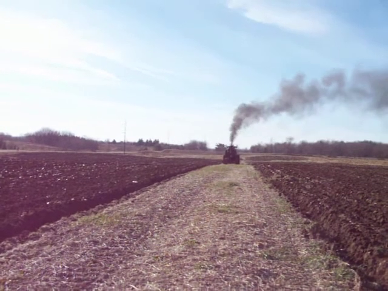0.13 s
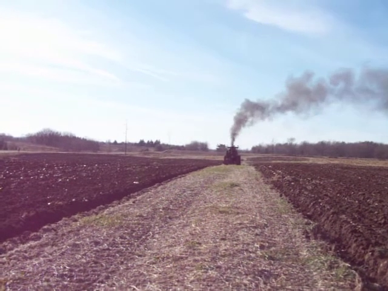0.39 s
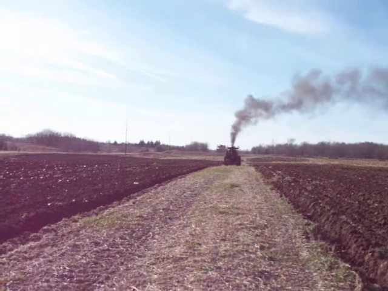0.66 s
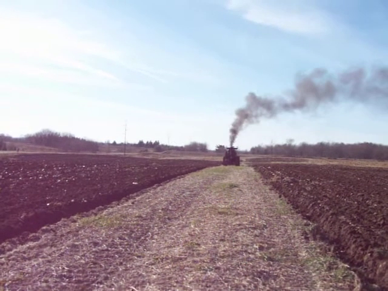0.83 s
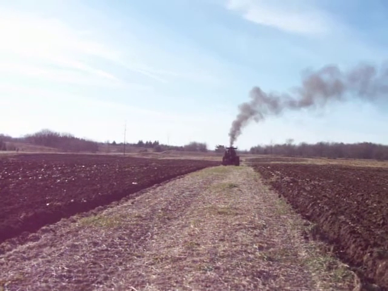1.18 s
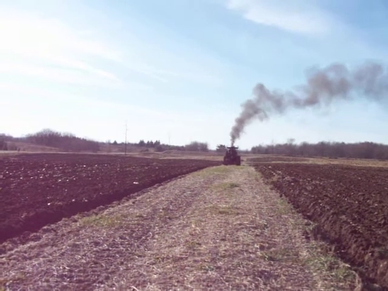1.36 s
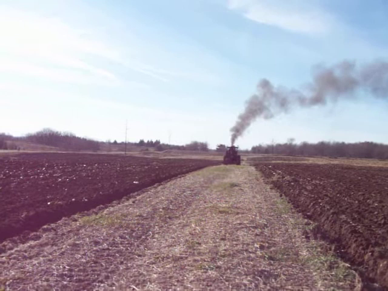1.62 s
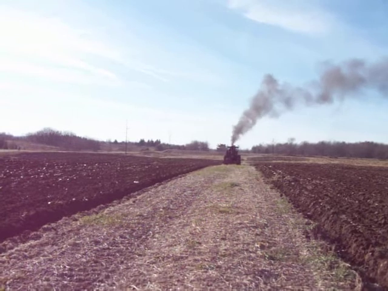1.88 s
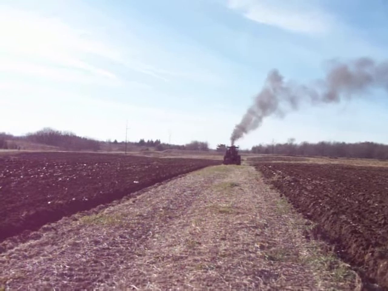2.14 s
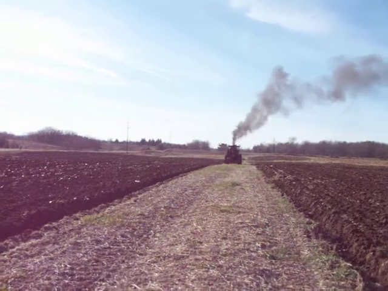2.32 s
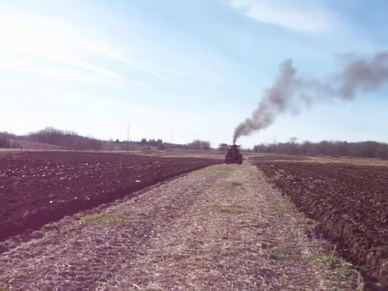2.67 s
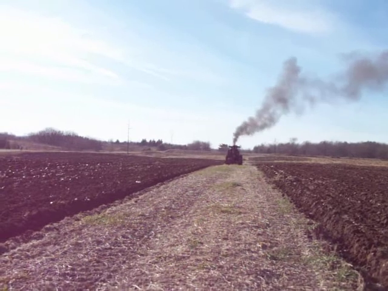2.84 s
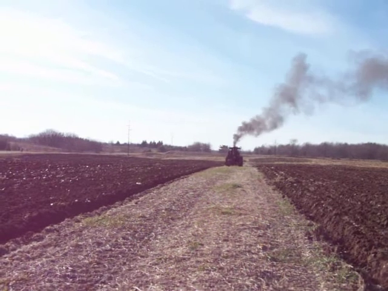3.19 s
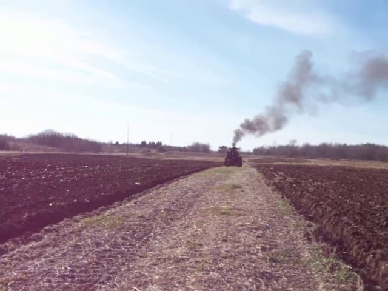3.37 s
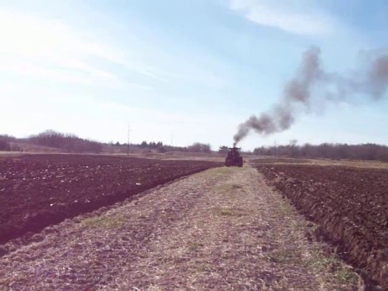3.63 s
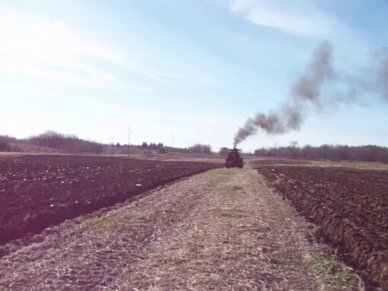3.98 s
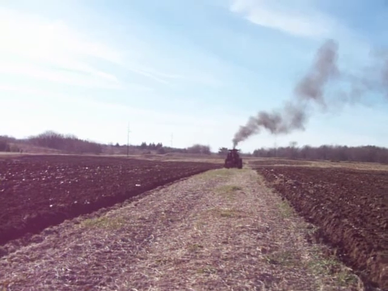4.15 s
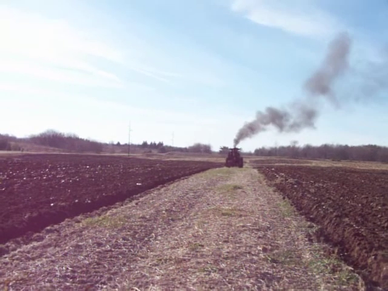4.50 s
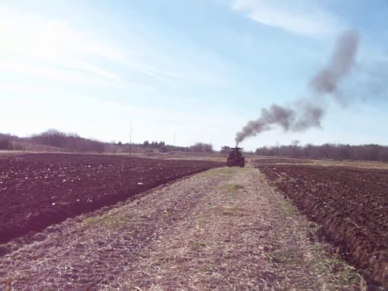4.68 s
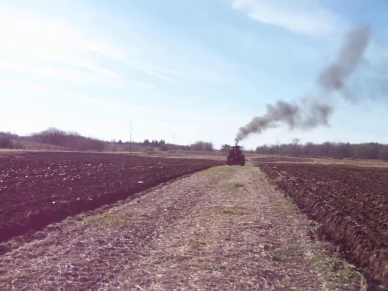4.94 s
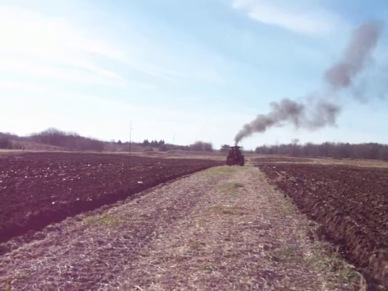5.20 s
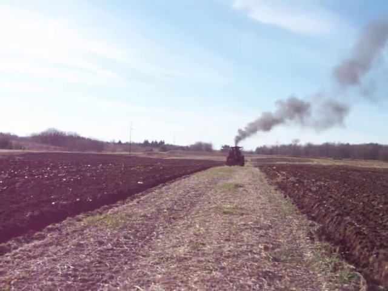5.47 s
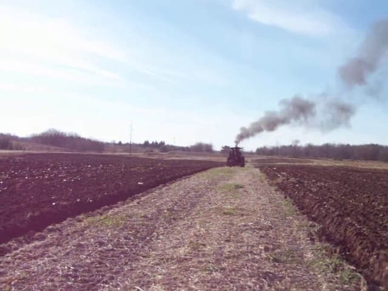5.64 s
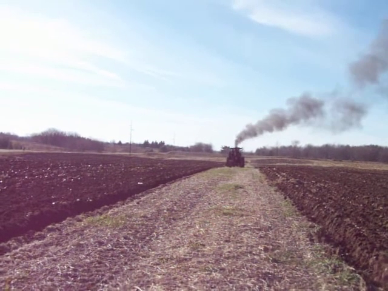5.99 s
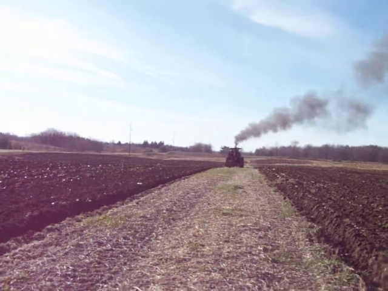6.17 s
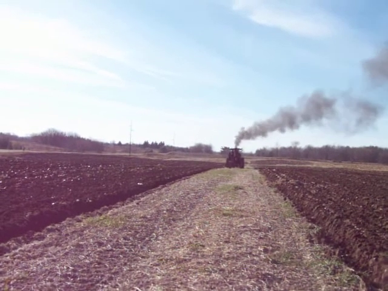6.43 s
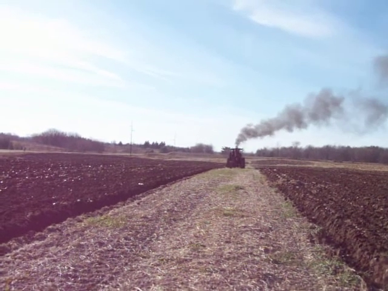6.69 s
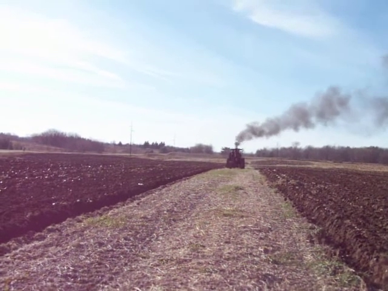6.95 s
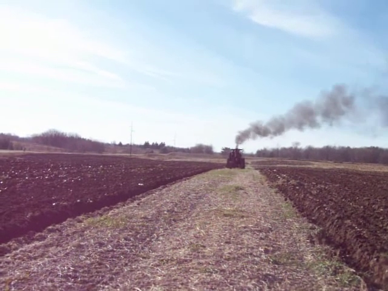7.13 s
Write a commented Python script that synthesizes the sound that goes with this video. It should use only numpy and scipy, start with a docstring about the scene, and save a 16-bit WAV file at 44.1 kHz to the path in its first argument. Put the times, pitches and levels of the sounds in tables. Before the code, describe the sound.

A distant steam traction engine chuffs rapidly and steadily across an open field, about seven breathy beats a second, over faint hiss, light rattling and wind rumble.

```python
"""Steam traction engine ploughing

A steam traction engine hauls a plough across an open field, some way off, at about seven chuffs a second.
Each exhaust beat is shaped noise, a turbulent steam jet, that also drives the resonances of the chimney.
The soil adds an inverted echo and the land scatters a thin tail. A steam leak hisses, ironwork sings, rasps
and rattles as narrow noise bands and short decaying sines, and wind rumbles and buffets the microphone."""
import sys
import numpy as np
from scipy import signal
from scipy.fft import rfft, irfft
from scipy.io import wavfile
from scipy.ndimage import map_coordinates

SR = 44100
rng = np.random.default_rng(int(sys.argv[2]) if len(sys.argv) > 2 else 0)


def master_out(mix):
    """Clip the mix to full scale and print it as 16-bit PCM to the path in sys.argv[1]."""
    frames = np.transpose(np.atleast_2d(mix))
    ceiling = np.clip(frames, -1, 1)
    pcm = np.round(ceiling * 32767).astype(np.int16)
    wavfile.write(sys.argv[1], SR, pcm)


N = 322812  # length in samples

# Relative spectrum of the jet noise leaving the chimney.
# Each row: frequency in Hz, spectral density in dB per Hz.
BLAST_SPECTRUM = [(130, -16.5), (300, -3.5), (450, -10), (720, 0.5), (1000, -6), (1380, -3.5), (1750, -4),
                  (2850, 1), (3700, 4.5), (4700, -7), (6100, -14), (6700, -24), (7400, -22.5), (8700, -45)]
# Resonances of the chimney and smokebox.
# Each row: frequency in Hz, bandwidth in Hz, relative level in dB.
CHIMNEY_MODES = [(186, 21.7, 19), (544, 26, 1), (678, 49, 2), (763, 38, -7), (828, 77, -6), (1374, 32, 1),
                 (2910, 170, 1.5)]


def exhaust(fall_s=0.023, fall_shape=1.13, lead_s=0.0036, tear_db=-1.0, hiss_db=-0.84, top_db=-1.0):
    """Jet noise and forced resonance: steam jets through the valve and dies away as the cylinder empties."""
    t = clock()
    flow = np.zeros((3, N))  # gains of roar, hiss and top
    for start, opening, roar, hiss, top_level in beats():
        first = max(int((start - lead_s) * SR), 0)
        span = slice(first, int(start * SR) + SR // 5)
        # the low roar comes first, the hiss once the jet is up to speed
        age = t[span] - start + np.array([[lead_s], [0], [0]])
        valve = np.sin(np.pi / 2 * np.clip(age / opening, 0, 1)) ** 2
        pressure = np.exp(-(np.maximum(age - opening, 0) / fall_s) ** fall_shape)
        gains = undb([roar, hiss + hiss_db, top_level + top_db])[:, None]
        flow[:, span] += gains * valve * pressure
    # the turbulent jet tears and sputters within each beat
    jet = ragged(noise(BLAST_SPECTRUM), depth_db=1.64, rate=210)
    jet = jet * undb(tear_db * walk(260))
    treble, top = above(jet, 1700), above(jet, 5100)
    blast = flow[0] * (jet - treble) + flow[1] * (treble - top) + flow[2] * top
    # noise with the envelope of the roar sets the air in the chimney ringing
    drive = flow[0] * noise([(4000, 1.0), (6000, -27)])
    ring = sum(undb(db) * resonate(drive, hz, width) for hz, width, db in CHIMNEY_MODES)
    return undb(3.5) * blast + undb(2.5) * ring


BEAT_S = 0.13714  # period before the lags below, in seconds
FIRST_PEAK_S = -0.023  # due time of the first full opening, in seconds
OPENING_S, OPENING_SCATTER = 0.025, 0.065  # typical valve opening time in seconds; spread of its logarithm
BEAT_DB, BEAT_SCATTER_DB = -29.5, 0.4  # base level and its random spread, both in dB
# The two strokes that alternate.
# Each row: delay in ms, level offset in dB, further offset of hiss and top in dB.
STROKE_PAIR = [(-2, -0.28, -0.5), (4.5, 0.67, -0.28)]
# The crank runs ahead and drops back as the plough's load changes.
# Each row: time in seconds, lag in ms.
LOAD_LAG = [(0, 3), (1.3, 1.5), (2.2, -2), (2.55, -12), (3.3, -10), (3.75, -6), (4.2, 9), (4.85, 2),
            (5.3, 2.5), (5.85, 2.5), (6.1, -5), (7.3, 0.5)]
# Level offsets as the moving air carries the beats over.
# Each row: time in seconds, roar in dB, hiss in dB, top in dB.
AIR_CARRY = [(0.11, 0.1, 1, -6), (0.53, 0.2, -2.1, -1), (1.62, -0.7, -0.4, -5), (2.17, 2.5, 2.5, 2),
             (2.58, 0.7, 1.5, 4), (2.86, -0.1, -0.6, -6), (3.27, -1.0, 1.5, 2.6), (3.95, 2.5, -3.4, 3.5),
             (4.64, -0.7, 1.8, 1.5), (4.91, -1.5, -2, 1), (5.05, -2, 2.9, 0.5), (5.19, 1, -4.5, -2),
             (5.6, 0.8, -0.7, -6.5), (6.15, -0.5, 3.5, 11.5), (6.42, 1, -0.7, 0.7), (7.25, 2.4, -3, 2)]


def beats():
    """Periodic forcing with jitter: rows of start s, opening s, and levels of roar, hiss and top in dB."""
    count = int(N / SR / BEAT_S) + 1
    carry_s, *bands = np.transpose(AIR_CARRY)
    rows = []
    for k, (slow, strong) in enumerate(rng.standard_normal((count, 2))):
        delay_ms, stroke_db, hiss = STROKE_PAIR[k % 2]
        due = FIRST_PEAK_S + k * BEAT_S
        lag_ms = np.interp(due, *np.transpose(LOAD_LAG)) + delay_ms
        peak = due + lag_ms / 1000
        opening = OPENING_S * np.exp(OPENING_SCATTER * slow)
        levels = BEAT_DB + stroke_db + BEAT_SCATTER_DB * strong + np.array([0, hiss, hiss])
        carried = [np.interp(due, carry_s, band) for band in bands]
        rows.append((peak - opening, opening, *(levels + carried)))
    return rows


# Sound reflected from the soil.
# Each row: time in seconds, lag behind the direct sound in ms, reflected share from 0 to 1.
SOIL_BOUNCE = [(0, 0.46, 0.15), (2.3, 0.502, 0.32), (3.2, 0.5, 0.2), (3.7, 0.599, 0.27), (5.5, 0.631, 0.28),
               (6.302, 0.54, 0.27), (7.3, 0.57, 0.06)]


def ground_bounce(x):
    """Comb interference: an inverted, delayed copy off the soil; moving air shifts the lag and the notches."""
    t = clock()
    s, lag_ms, share = np.transpose(SOIL_BOUNCE)
    lag = np.interp(t, s, lag_ms) * SR / 1000  # in samples
    reflected = map_coordinates(x, [np.arange(N) - lag], order=3, mode="nearest")
    return x - np.interp(t, s, share) * reflected


# Colour of the sound that the land scatters back.
# Each row: frequency in Hz, gain in dB.
SCATTER_COLOUR = [(180, 7), (400, 0), (700, 1.5), (1300, -1), (2400, -1), (3400, 0), (4700, -3.5),
                  (8000, 0)]


def field(x, t60_s=0.28, build_s=0.23, tail_db=-8):
    """Diffuse scattering: furrows and far trees return a random-phase tail that follows the beat energy."""
    t = clock()[:SR]
    decay = (undb(-60 * t / t60_s) * (1 - np.exp(-t / build_s))) ** 2
    energy = np.abs(signal.fftconvolve(x ** 2, decay / decay.sum())[:N])
    spectrum = np.abs(rfft(x))
    phase = 2 * np.pi * rng.random(len(spectrum))
    scrambled = unit(irfft(spectrum * np.exp(1j * phase), N))
    return undb(tail_db) * np.sqrt(energy) * colour(scrambled, SCATTER_COLOUR)


# Relative spectrum of the steady steam leak and running gear.
# Each row: frequency in Hz, spectral density in dB per Hz.
LEAK_SPECTRUM = [(80, 13.5), (190, 6), (300, 8.5), (460, -2.5), (720, -2), (1400, 1), (2400, -7),
                 (2950, -4.5), (3500, 6), (4000, -7), (4700, -10.5), (5400, -10.5), (6700, -21.5),
                 (7300, -23.5), (8700, -43.5)]
# Course of the leak before the trim leak_db.
# Each row: time in seconds, level in dB.
LEAK_COURSE = [(0, -36), (0.5, -45), (0.9, -40), (1.8, -40), (2.75, -38.5), (4.2, -42.5), (5.5, -41.5),
               (6.14, -37), (6.6, -41.5), (7.3, -42)]


def steam_leak(leak_db=2.5):
    """Turbulent leakage: broadband noise whose bands flicker apart from one another."""
    level = np.interp(clock(), *np.transpose(LEAK_COURSE)) + leak_db
    return ragged(noise(LEAK_SPECTRUM), depth_db=4.5, rate=33) * undb(level)


# Modes of the singing ironwork.
# Each row: frequency in Hz, bandwidth of each of two filter passes in Hz, relative level in dB.
IRON_MODES = [(1162, 80, 0), (2148, 90, -8)]
IRON_DB, IRON_RISE_DB_PER_S = -54.5, 0.63  # the ironwork sings louder as the engine works along
# Brief rasps of the moving iron.
# Each row: time of the height in seconds, length in seconds, level in dB, pitch in Hz.
IRON_RASPS = [(0.86, 0.11, -40, 3700), (2.77, 0.03, -34, 3300), (2.78, 0.042, -46, 4300),
              (3.035, 0.05, -46.5, 5470), (6.08, 0.053, -39.5, 3360), (6.215, 0.058, -39, 2950)]


def ironwork():
    """Modal vibration: noise through narrow resonances sings unevenly, and bursts of band noise rasp."""
    ringing = IRON_DB + IRON_RISE_DB_PER_S * clock()
    iron = 0
    for hz, width, db in IRON_MODES:
        once = resonate(rng.standard_normal(N), hz, width)
        mode = unit(resonate(once, hz, width))
        waver_db = 3.5 * walk(12)
        iron = iron + mode * undb(ringing + db + waver_db)
    return iron + swells(IRON_RASPS, spread=0.11)


def rattle(count=420, rattle_db=-50):
    """Impact excitation: gears and plough chink at random, each touch a decaying sine at its own pitch."""
    out, t = np.zeros(N + SR), np.arange(SR // 20) / SR
    ring_s, scatter_db = .003, 3  # decay time to 1/e; spread of the strengths
    for when, pitch, force in rng.random((count, 3)):
        hz = 1000 * 6 ** pitch  # from 1 to 6 kHz
        size = undb(scatter_db * min(-np.log(1 - force), 3))
        start = int(when * N)
        chink = np.exp(-t / ring_s) * np.sin(2 * np.pi * hz * t)
        out[start:start + len(t)] += size * chink
    far = colour(out[:N], [(1000, -2), (2300, -3), (3400, 2), (4500, -8), (6000, -15), (8000, -30)])
    return undb(rattle_db) * unit(far)


# Relative spectrum of the light breeze on the microphone.
# Each row: frequency in Hz, spectral density in dB per Hz.
BREEZE_SPECTRUM = [(15, -16.5), (35, -4), (70, 0.5), (125, -6), (200, -13), (320, -17), (600, -41.5),
                   (1500, -68.5)]
# Strength of the breeze before the trim breeze_db.
# Each row: time in seconds, level in dB.
BREEZE_COURSE = [(0, -36), (0.45, -36.5), (0.6, -49), (0.8, -38.5), (1.5, -34), (1.9, -38), (2.12, -29),
                 (2.5, -39.5), (2.75, -31.5), (3.0, -39), (3.55, -28.5), (4.3, -28.5), (4.9, -38.5),
                 (5.4, -34), (5.951, -41.5), (6.42, -27), (6.8, -38), (7.3, -41.5)]
# Gusts, before their random buffeting.
# Each row: time of the height in seconds, length in seconds, level in dB, eddy rate in Hz.
GUST_LIST = [(0.06, 0.077, -25, 101), (0.445, 0.07, -26.5, 91), (1.525, 0.02, -24.5, 84),
             (2.63, 0.059, -21, 180), (2.705, 0.043, -18, 144), (2.712, 0.023, -23.5, 285),
             (3.22, 0.19, -30, 147), (3.635, 0.064, -22.5, 165), (3.82, 0.22, -23.5, 150),
             (4.21, 0.24, -21, 149), (4.55, 0.2, -23, 143), (6.39, 0.11, -24, 85), (6.94, 0.042, -24, 72)]


def wind(breeze_db=-1.0, flutter_db=2, buffet_db=2):
    """Turbulent pressure: a breeze rumbles on the microphone and gusts buffet it near their eddy rates."""
    strength = np.interp(clock(), *np.transpose(BREEZE_COURSE))
    breeze = noise(BREEZE_SPECTRUM) * undb(strength + breeze_db + flutter_db * walk(42))
    gusts = swells(GUST_LIST, spread=0.36) * undb(buffet_db * walk(20))
    return breeze + gusts


def swells(table, spread):
    """Band-limited noise under Gaussian envelopes; spread sets the band edges as a ratio to the pitch."""
    out = np.zeros(N)
    for s, length, db, hz in table:
        centre = int(s * SR)
        at = np.arange(max(centre - SR // 5, 0), min(centre + SR // 5, N))
        edges = [hz / (1 + spread), hz * (1 + spread)]
        sos = signal.butter(2, edges, "band", fs=SR, output="sos")
        band = signal.sosfilt(sos, rng.standard_normal(SR))[-len(at):]  # filter already settled
        shape = np.exp(-2 * ((at / SR - s) / length) ** 2)
        out[at] += undb(db) * unit(band * shape) * np.sqrt(np.mean(shape ** 2))
    return out


def ragged(x, depth_db, rate):
    """Independent modulation: every band of the spectrum above 1300 Hz flickers on its own."""
    out = 0
    for hz in (6000, 4300, 3300, 2300, 1300):
        upper = above(x, hz)
        out = out + upper * undb(depth_db * walk(rate))
        x = x - upper
    return out + x


def walk(rate):
    """Low-passed Gaussian noise: smooth chance of spread 1, its spectrum falling to 1/e at rate Hz."""
    coarse = rng.standard_normal(N // 20)
    f = np.fft.rfftfreq(len(coarse), 20 / SR)
    smooth = irfft(rfft(coarse) * np.exp(-(f / rate) ** 2), len(coarse))
    return np.interp(np.arange(N) / 20, np.arange(len(coarse)), unit(smooth))


def noise(points):
    """Spectral shaping: white noise given a colour, rms 1."""
    return unit(colour(rng.standard_normal(N), points))


def colour(x, points):
    """Linear filtering: gains from (Hz, dB) points joined on a log-frequency axis."""
    hz, db = np.transpose(points)
    f = np.maximum(np.fft.rfftfreq(len(x), 1 / SR), 1)
    gain = undb(np.interp(np.log(f), np.log(hz), db))
    return irfft(rfft(x) * gain, len(x))


def resonate(x, hz, width):
    """Simple resonance: a single mode with gain 1 at its centre."""
    return signal.lfilter(*signal.iirpeak(hz, hz / width, fs=SR), x)


def above(x, hz):
    """Zero-phase high-pass: the part of x above hz, in phase with x."""
    return signal.sosfiltfilt(signal.butter(3, hz, "high", fs=SR, output="sos"), x)


def undb(db):
    """Logarithmic level: decibels to amplitude gain."""
    return 10 ** (np.asarray(db) / 20)


def unit(x):
    """Normalisation: scale to an rms of 1."""
    return x / np.sqrt(np.mean(x ** 2))


def clock():
    """Uniform sampling: time of every sample in seconds."""
    return np.arange(N) / SR


def scene():
    """Superposition: the engine heard over the field, with wind close by."""
    chuffs = ground_bounce(exhaust())
    engine = chuffs + field(chuffs) + steam_leak() + ironwork() + rattle()
    return (engine + wind())[None]


TOP_HZ = 8750  # upper band edge


def record(dry):
    """Band limiting: a steep elliptic low-pass keeps little of the top octave."""
    return signal.sosfilt(signal.ellip(10, .2, 80, TOP_HZ, fs=SR, output="sos"), dry)


dry = scene()
out = record(dry)
master_out(out)
```